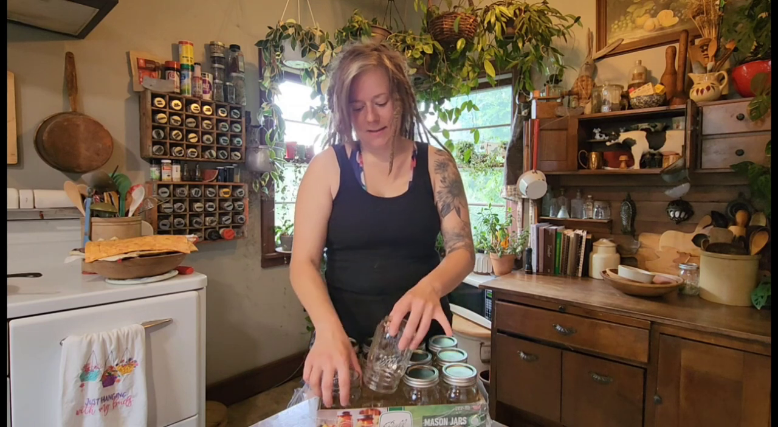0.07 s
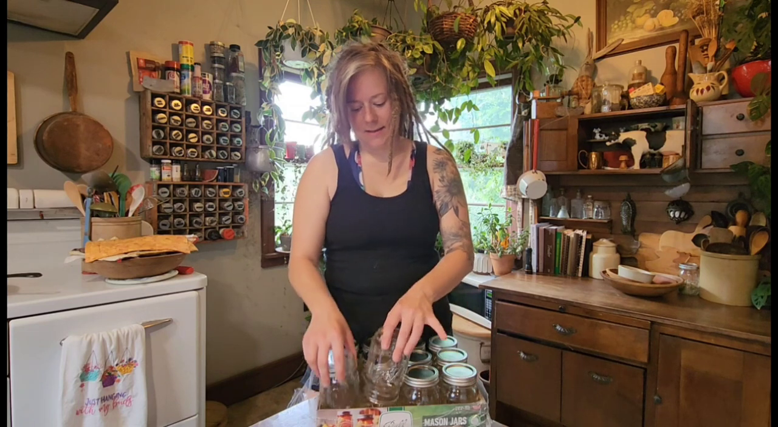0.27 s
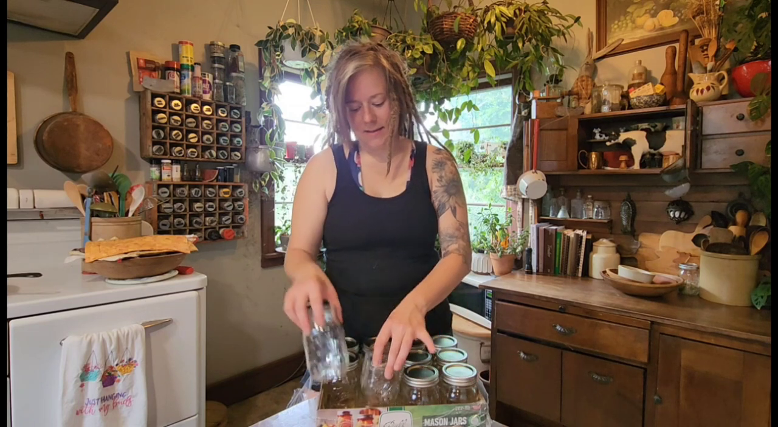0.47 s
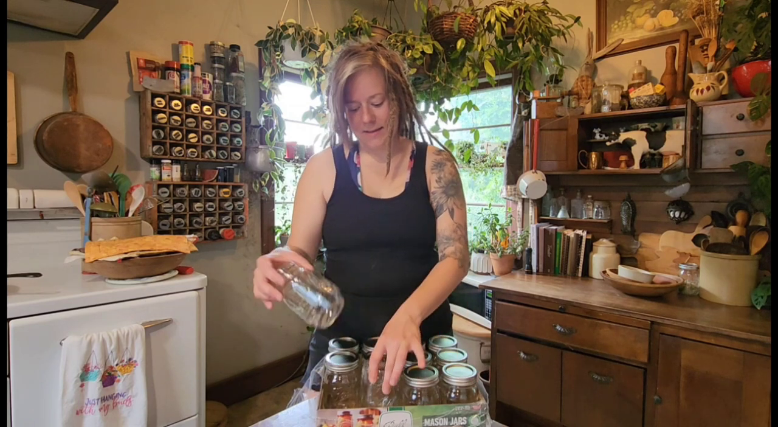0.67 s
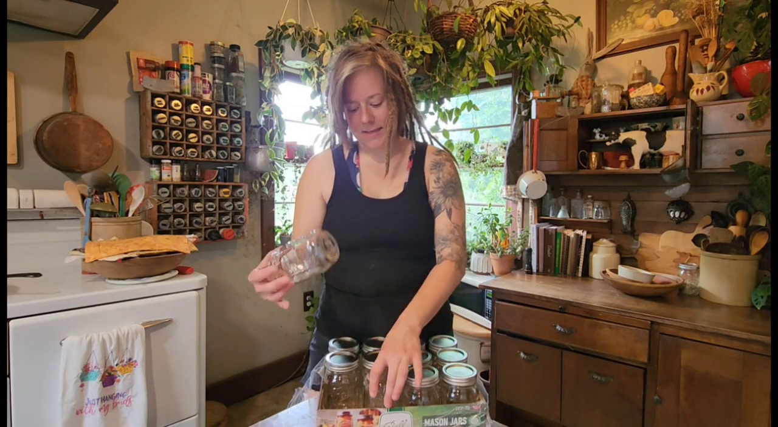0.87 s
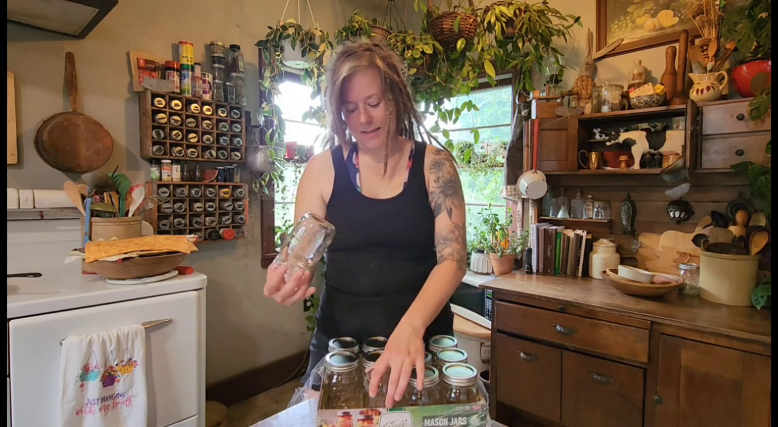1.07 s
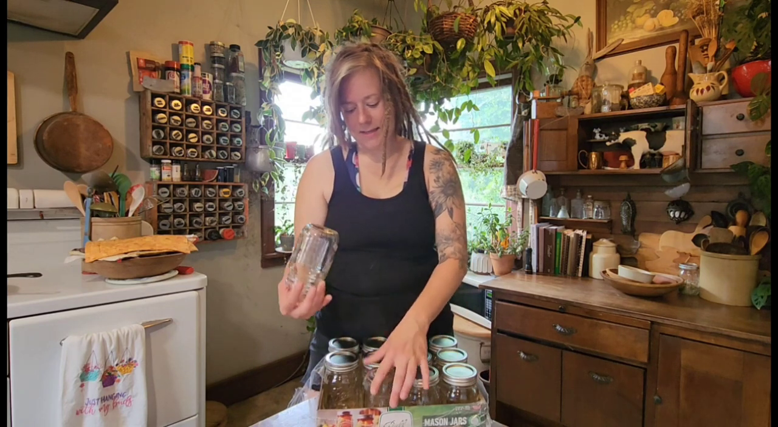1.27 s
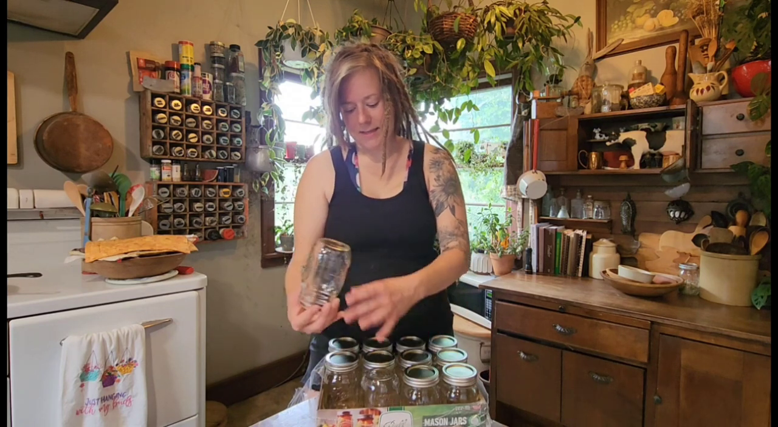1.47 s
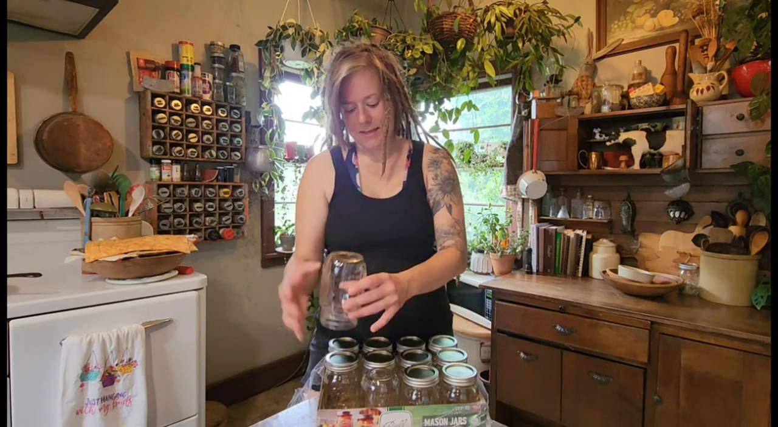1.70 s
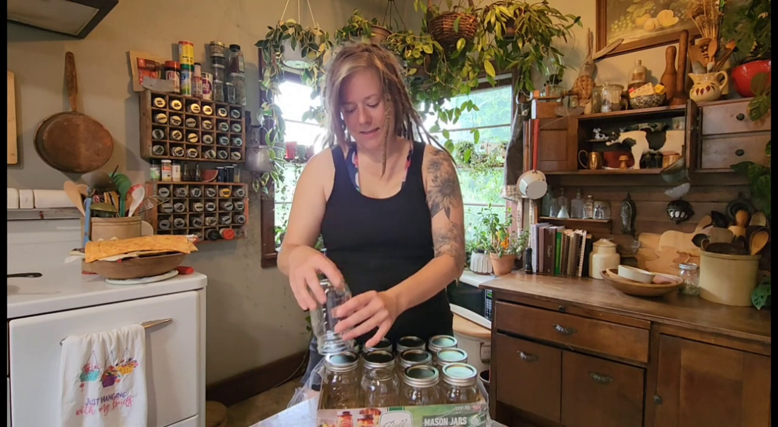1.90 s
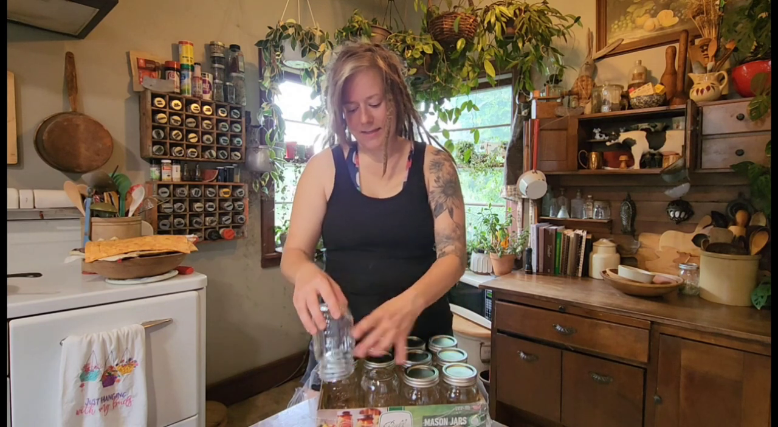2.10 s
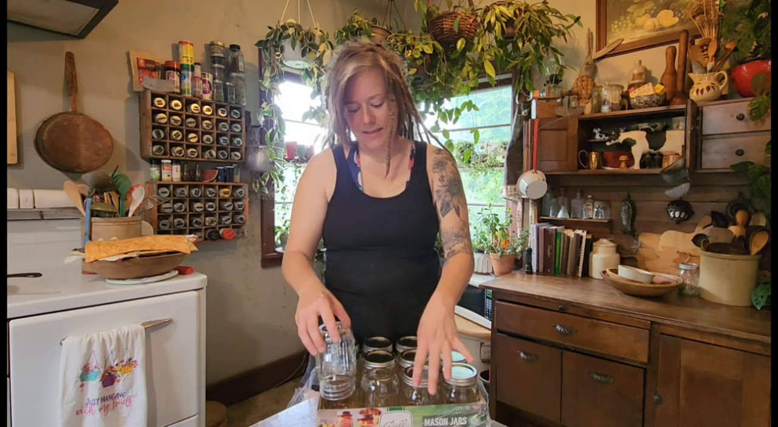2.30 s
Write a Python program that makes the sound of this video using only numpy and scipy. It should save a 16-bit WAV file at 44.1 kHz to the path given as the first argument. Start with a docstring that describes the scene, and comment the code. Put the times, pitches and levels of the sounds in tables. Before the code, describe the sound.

Glass jars knock and clink on a kitchen table. At about 0.25 seconds one is set down with a ringing knock and a quick rattle. Another clink comes at 0.6 seconds. Jars scrape briefly and chatter together around 0.8 and again around 1.3 seconds, with faint taps and a soft low rumble between. From about 1.6 seconds there is little but dull room air and a faint hum.

```python
"""A knock and a clink: an empty glass jar is set down against its neighbours on a kitchen table.
Other jars then tap, scrape and chatter together. Each impact excites dense, heavily damped modes
(the knock) and a few longer-lived modes of glass or table (the ring); sliding excites the glass
by stick-slip friction. The table booms softly, the room reverberates briefly, and a low rumble,
dull air and a mains hum lie under it all."""
import sys
import numpy as np
from scipy import signal
from scipy.fft import rfft, irfft
from scipy.io import wavfile

SR = 44100
rng = np.random.default_rng(int(sys.argv[2]) if len(sys.argv) > 2 else 0)


def persist_wave(psi):
    """Save psi, clipped to +-1, as 16-bit WAV."""
    counts = np.round(np.clip(psi, -1, 1) * 32767).astype(np.int16)
    wavfile.write(sys.argv[1], SR, np.atleast_2d(counts).T)


N = 108045

# spectrum of the room's air: (f/Hz, relative density/dB)
AIR_SPECTRUM = [(15, -62.5), (25, -26), (50, -5.5), (80, -11.5), (120, -9), (160, -11.5), (220, -3),
                (280, -15), (360, -8.5), (520, -10), (940, -20.5), (1800, -30), (2030, -22.5),
                (2300, -36.5), (3000, -34), (4200, -44.5), (5700, -37.5), (7000, -44), (8200, -39.5),
                (9500, -60), (16000, -68)]
# harmonics of the mains hum: (f/Hz, rms level/dB)
HUM_PARTIALS = [(59.5, -62), (119, -56.5), (238, -67.5)]
# envelope of the rumble while the jars are shifted: (t/s, rms level/dB)
RUMBLE_ENVELOPE = [(.78, -75), (.87, -46), (1.05, -51), (1.201, -64), (1.36, -52), (1.6, -63.5)]
# spectrum of that rumble: (f/Hz, relative density/dB)
RUMBLE_SPECTRUM = [(20, -16.5), (50, 1), (90, 4), (130, -14), (300, -52.5)]
# reverberation time of the kitchen: (f/Hz, T60/s)
REVERB_TIMES = [(100, 0.26), (500, 0.31), (2000, 0.34), (6000, 0.36), (14000, 0.25)]
# left-right coherence of the noise: (f/Hz, correlation coefficient)
COHERENCE = [(100, 0.98), (300, .93), (600, 0.79), (1200, .1), (3000, 0.1), (10000, 0.042)]
# interaural level difference of the jars: (f/Hz, left minus right/dB)
LEVEL_DIFFERENCE = [(300, 0), (1200, -2.36), (3000, 1), (6000, -4.5), (7400, -0.5), (9000, 1.5), (14000, 7)]
# the table's boom after a contact: (f/Hz, relative density/dB)
BOOM_SPECTRUM = [(30, -14.5), (70, -12.5), (110, -1.5), (160, -5), (260, -12), (600, -67.5)]
# dense modes of a jar striking the table: (f/Hz, relative density/dB)
KNOCK_SPECTRUM = [(100, -26.5), (270, -22), (380, 3), (520, 2), (750, -1.5), (1100, -7.5), (2200, -11.5),
                  (3700, -11.5), (5000, -19), (8000, -27.5), (9100, -25), (10300, -43.5), (11400, -34.5),
                  (12600, -19.5), (13600, -30.5), (14400, -29.5), (16000, -38.5)]
# dense modes of a jar striking a jar: (f/Hz, relative density/dB)
CLACK_SPECTRUM = [(100, -16), (280, -17), (380, 0.5), (540, -0.5), (800, 1), (1050, 3.5), (1600, -6.5),
                  (2000, -11), (2500, -28), (3200, -5), (3900, -15.5), (4600, -22), (5900, -7.5),
                  (6700, -22), (7400, -4.5), (8600, -29.5), (9800, -42), (10600, -22.5), (11400, -39.5),
                  (12700, -24), (16000, -33)]
# modes of the jars that tap: (f/Hz, relative level/dB, T60/s before scaling by the grip)
TAPPING_MODES = [(1010, -10, .19), (2996, 3.5, 0.29), (3000, -11.5, 0.25), (3057, -17, .14),
                 (3140, -2.5, .12), (5760, -9, .12), (5850, -9.5, 0.2), (6193, -12, .18), (7240, -23, .26),
                 (7210, -11.5, 0.11), (7430, -21.5, 0.47), (8990, -25, .22), (10530, -23.5, 0.29),
                 (12676, -30.5, .12), (14400, -33, .11)]
# low knock tones of the table and higher ringing of the jar set down: (f/Hz, relative level/dB, T60/s)
LANDING_MODES = [(493.5, -4, 0.098), (548, -4, 0.06), (642, -14.5, 0.17), (3014, 0, 0.18),
                 (3080, -14, 0.28), (3061, 7, .03), (1900, -14, 0.11), (5740, -24, .12),
                 (6225, -3.5, 0.063), (9075, -15.5, 0.28), (12800, -19, .06), (12330, -25.5, 0.0566),
                 (14220, -22.5, .09)]
# glass slides on glass: (start t/s, duration/s, final level/dB, swell/dB, tilt/(dB per octave))
SCRAPE_EVENTS = [(0.212, 0.036, -31.5, 8, 3), (0.782, 0.047, -33, 9.5, 1.5), (0.824, 0.056, -32, -7, 0),
                 (1.063, 0.023, -48.5, -15.5, -1), (1.195, 0.014, -47.5, -9, -4.5),
                 (1.27, .044, -28.5, 24, -0.5), (1.322, 0.028, -35.5, -13, 1)]
# jar taps jar: (t/s, clack gain/dB, tilt/(dB per octave), ring gain/dB, T60 factor, upper-mode gain/dB)
TAP_EVENTS = [(0.6016, -20.5, 1.5, -26, 1.1, 0.5), (0.7618, -25.5, -2, -41.5, 0.59, 6),
              (0.8191, -17.5, 1.8, -24, 0.28, 6.5), (0.8379, -36.5, 1, -28.5, .5, 3.5),
              (0.8486, -25.5, -2.5, -23, .5, -23), (0.8593, -24.5, -0.5, -34, .45, 6),
              (.881, -34.5, -8.5, -32.5, 0.38, 2), (1.0601, -30.5, -1.5, -35, 0.26, -7.5),
              (1.1843, -31, -1.5, -48.5, 0.23, 11.5), (1.3024, -33, 1.5, -41, .4, -6),
              (1.315, -19, -3.5, -32.5, 0.52, 12), (1.3313, -21, 4, -29.5, 0.26, 10),
              (1.349, -34, 3.5, -51, 0.31, 30), (1.366, -46, 3, -41, 0.2, 22),
              (2.059, -71.5, -3, -73, 1, 6)]
# a jar lands on the table: (t/s, knock gain/dB, ring gain/dB, knock tilt/(dB per octave))
LANDING_EVENTS = [(.1445, -36, -82, -6), (0.2426, -17, -19, 1.5), (0.2442, -15.5, -15, 1),
                  (.262, -21, -30, 1.5), (.285, -20.5, -47, -0.5), (.364, -26.5, -61.5, -4),
                  (.380, -27.5, -45, -8), (0.6015, -22, -34.5, 2)]

AIR_DB = -52.5
REVERB_DB, REVERB_GAP_S, RING_TO_ROOM_DB = -1.5, .005, -7.5
RIGHT_LAG_S, CUTOFF_HZ = .00004, 16000
BOOM_DB, BOOM_RISE_S = -24.5, 0.029
KNOCK_T60_S, CLACK_T60_S, CONTACT_S = 0.04, 0.033, .0016
MODE_SPREAD_DB, RING_ATTACK_S = 1.8, 0.0019
UPPER_FROM_HZ, NEIGHBOUR_DB, NEIGHBOUR_DETUNE = 4000, -6, 0.0088
SLIPS_PER_S, SLIP_SPREAD_DB, SCRAPE_RING_DB = 1000, 4, -20.5
DECAY_SAMPLES = SR * 3 // 4


def from_db(db):
    """Amplitude ratio of a level in decibels."""
    return 10 ** (np.asarray(db) / 20)


def at_hz(points, hz):
    """Interpolation of a table on a logarithmic frequency axis."""
    f, values = np.transpose(points)
    return np.interp(np.log(np.maximum(hz, 1)), np.log(f), values)


def add(out, start_s, sound):
    """Superposition: a sound adds to the mix from a given time."""
    i = max(int(start_s * SR), 0)
    out[..., i:i + sound.shape[-1]] += sound[..., :N - i]


def unit_energy(x):
    """Normalisation of a stereo response to a mean energy of 1 per channel."""
    return x / np.sqrt((x ** 2).sum() / 2)


def noise(spectrum, size):
    """Partial coherence: coloured stereo noise of rms 1, alike in the bass and diffuse in the treble."""
    hz = np.arange(size // 2 + 1) * SR / size
    coherence = np.clip(at_hz(COHERENCE, hz), -1, 1)
    mid, side = rfft(rng.standard_normal((2, size)))
    white = np.sqrt(1 + coherence) * mid + np.sqrt(1 - coherence) * side * [[1], [-1]]
    x = irfft(from_db(at_hz(spectrum, hz)) * white, size)
    return x / x.std()


def room_tone():
    """Ambient noise: a continuous spectrum of dull air plus the line spectrum of an appliance's hum."""
    t = np.arange(N) / SR
    air = from_db(AIR_DB) * noise(AIR_SPECTRUM, N)
    hum = sum(from_db(db) * np.sqrt(2) * np.sin(2 * np.pi * (hz * t + rng.random()))
              for hz, db in HUM_PARTIALS)
    return air + hum


def rumble():
    """Amplitude modulation: low noise swells and fades under the handling."""
    level_db = np.interp(np.arange(N) / SR, *np.transpose(RUMBLE_ENVELOPE))
    return from_db(level_db) * noise(RUMBLE_SPECTRUM, N)


def kitchen_reverb(x):
    """Reverberation: convolution with a diffuse tail, each band decaying at its own exponential rate."""
    t = np.arange(DECAY_SAMPLES) / SR
    hz = np.arange(len(t) // 2 + 1) * SR / len(t)
    white = rfft(noise([(20, 0), (20000, 0)], len(t)))
    edges = np.geomspace(20, SR / 2, 11)
    tail = 0
    for lo, hi in zip(edges, edges[1:]):
        band = irfft(white * (hz >= lo) * (hz < hi), len(t))
        tail = tail + band * from_db(-60 * t / at_hz(REVERB_TIMES, np.sqrt(lo * hi)))
    tail = unit_energy(tail * (t > REVERB_GAP_S))
    return from_db(REVERB_DB) * signal.fftconvolve(x, tail, axes=1)[:, :N]


def at_ears(x):
    """Interaural differences: each register leans to one side, and the right ear hears slightly later."""
    hz = np.arange(N + 1) * SR / (2 * N)
    lean = from_db(at_hz(LEVEL_DIFFERENCE, hz) / 2 * np.array([[1], [-1]]))
    delay = np.exp(-2j * np.pi * hz * RIGHT_LAG_S * np.array([[0], [1]]))
    return irfft(rfft(x, 2 * N) * lean * delay)[:, :N]


def table_boom():
    """Transient response: the table's low vibration builds up after a contact and dies away."""
    u = np.arange(DECAY_SAMPLES) / SR / BOOM_RISE_S
    return from_db(BOOM_DB) * noise(BOOM_SPECTRUM, len(u)) * u * np.exp(1 - u)


def impact(spectrum, t60, tilt_db):
    """Modal overlap: close, damped modes merge into noise; a harder contact tilts it to the treble."""
    t = np.arange(DECAY_SAMPLES) / SR
    tilted = [(hz, db + tilt_db * np.log2(hz)) for hz, db in spectrum]
    envelope = (1 - np.exp(-t / CONTACT_S)) * from_db(-60 * t / t60)
    decay_energy = t60 * SR / np.log(10 ** 6)  # that of an exponential decay starting at 1
    return unit_energy(noise(tilted, len(t)) * envelope) * np.sqrt(decay_energy)


def modal_ring(modes, t60_factor=1, upper_db=0, neighbours=3):
    """Free vibration of jar or table: a sum of decaying modes; a grip on the jar shortens the decay."""
    t = np.arange(DECAY_SAMPLES) / SR
    out = 0
    for hz, db, t60 in modes:
        tone = np.cos(2 * np.pi * hz * t)
        if hz > UPPER_FROM_HZ:  # neighbouring jars answer slightly out of tune, causing beats
            answers = sum(np.sin(2 * np.pi * hz * (1 + NEIGHBOUR_DETUNE * offset) * t) * np.sign(polarity)
                          for offset, polarity in rng.standard_normal((neighbours, 2)))
            tone = from_db(upper_db) * (tone + from_db(NEIGHBOUR_DB) * answers)
        struck_db = db + rng.normal(0, MODE_SPREAD_DB)
        out = out + tone * from_db(struck_db - 60 * t / (t60 * t60_factor))
    return out * (1 - np.exp(-t / RING_ATTACK_S))


def scrapes():
    """Stick-slip friction: runs of tiny random impulses drive the modes of the glass."""
    out = np.zeros((2, N))
    slipping = rng.random(N) < SLIPS_PER_S / SR
    slips = slipping * from_db(rng.normal(0, SLIP_SPREAD_DB, N)) * rng.choice([-1, 1], N)
    glass = from_db(SCRAPE_RING_DB) * modal_ring(TAPPING_MODES, t60_factor=0.38, upper_db=7.5)
    for start_s, duration_s, db, swell_db, tilt_db in SCRAPE_EVENTS:
        run = slips[int(start_s * SR):int((start_s + duration_s) * SR)]
        force = run / (run.std() + 1e-3) * from_db(db + np.linspace(-swell_db, 0, len(run)))
        response = unit_energy(impact(CLACK_SPECTRUM, CLACK_T60_S / 2, tilt_db) + glass)
        add(out, start_s, signal.fftconvolve(force[None], response, axes=1))
    return out


def taps():
    """Impulsive excitation of jar by jar: returns the clacks with the table's boom, and the rings."""
    clacks, rings = np.zeros((2, 2, N))
    strongest_hz = max(TAPPING_MODES, key=lambda mode: mode[1])[0]
    for start_s, clack_db, tilt_db, ring_db, t60_factor, upper_db in TAP_EVENTS:
        clack = impact(CLACK_SPECTRUM, CLACK_T60_S, tilt_db) + table_boom()
        add(clacks, start_s, from_db(clack_db) * clack)
        in_phase_s = np.round(start_s * strongest_hz) / strongest_hz  # this mode adds constructively
        add(rings, in_phase_s, from_db(ring_db) * modal_ring(TAPPING_MODES, t60_factor, upper_db))
    return np.array([clacks, rings])


def landings():
    """Impulsive excitation by a jar set down: returns the knocks, and the ringing of table and jar."""
    knocks, rings = np.zeros((2, 2, N))
    for start_s, knock_db, ring_db, tilt_db in LANDING_EVENTS:
        knock = impact(KNOCK_SPECTRUM, KNOCK_T60_S, tilt_db) + from_db(-10.5) * table_boom()
        add(knocks, start_s, from_db(knock_db) * knock)
        add(rings, start_s, from_db(ring_db) * modal_ring(LANDING_MODES))
    return np.array([knocks, rings])


def scene():
    """Superposition of the jars' direct sound, their reverberant field and the background."""
    contacts, rings = landings() + taps()
    contacts = contacts + scrapes()
    reverb = kitchen_reverb(contacts + from_db(RING_TO_ROOM_DB) * rings)
    return at_ears(contacts + rings + reverb) + rumble() + room_tone()


def record(dry):
    """Band limiting: an elliptic low-pass filter cuts the highest treble steeply."""
    return signal.sosfilt(signal.ellip(10, .2, 70, CUTOFF_HZ, fs=SR, output="sos"), dry)


dry = scene()
out = record(dry)
persist_wave(out)
```